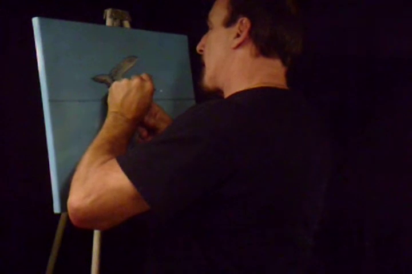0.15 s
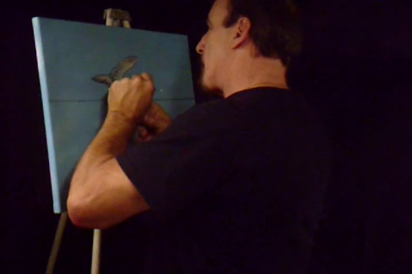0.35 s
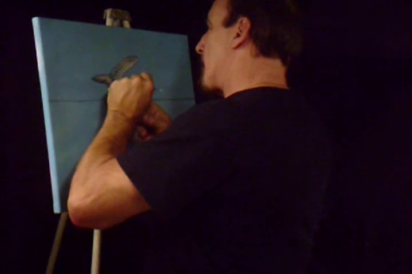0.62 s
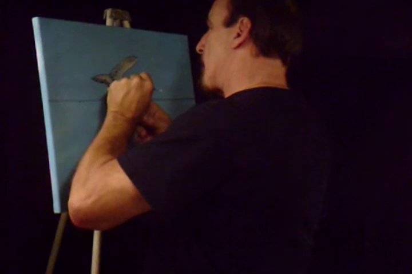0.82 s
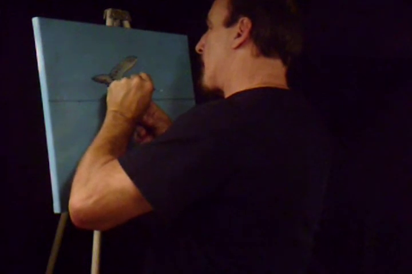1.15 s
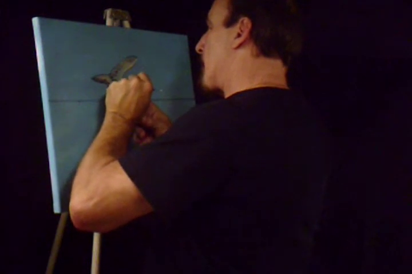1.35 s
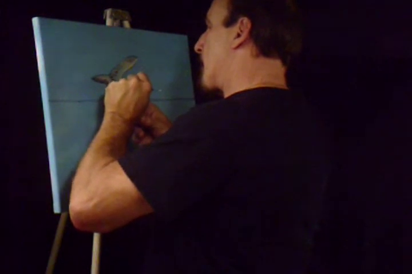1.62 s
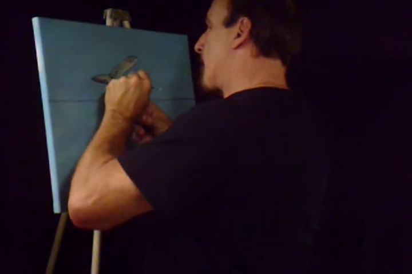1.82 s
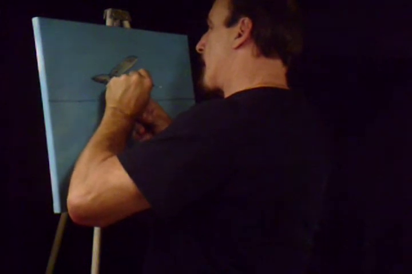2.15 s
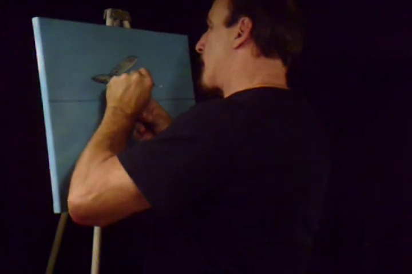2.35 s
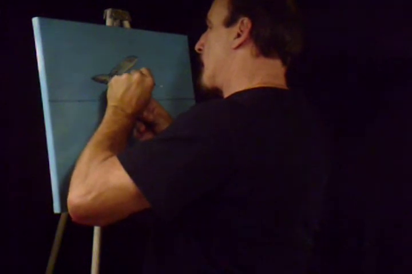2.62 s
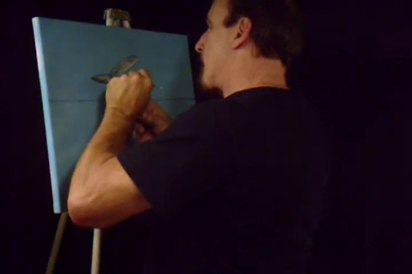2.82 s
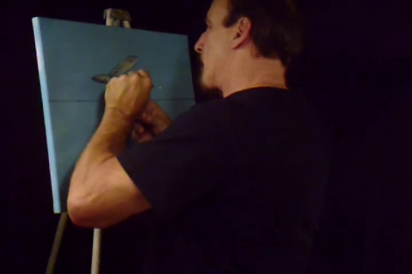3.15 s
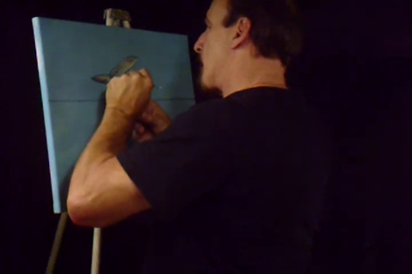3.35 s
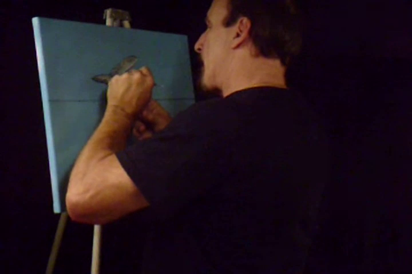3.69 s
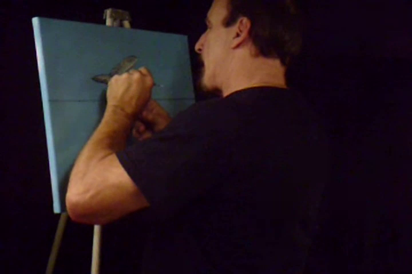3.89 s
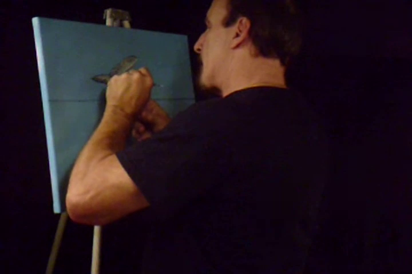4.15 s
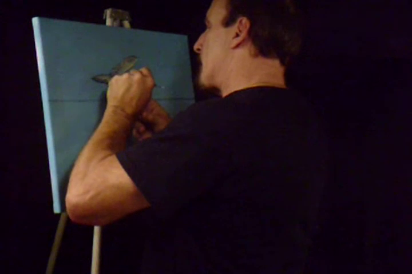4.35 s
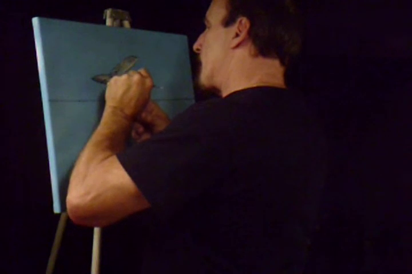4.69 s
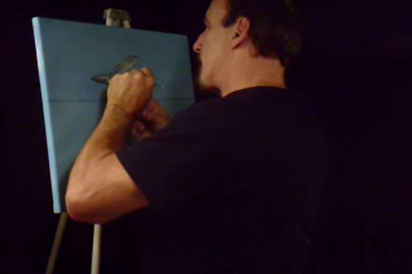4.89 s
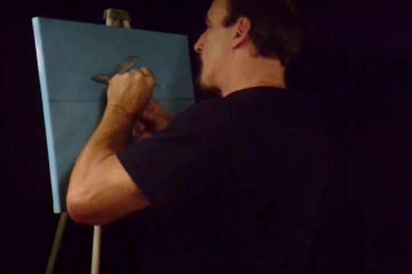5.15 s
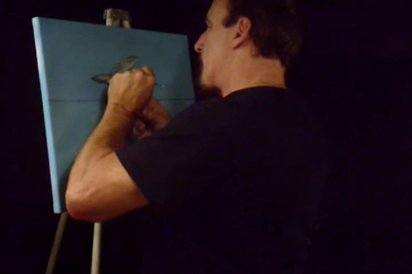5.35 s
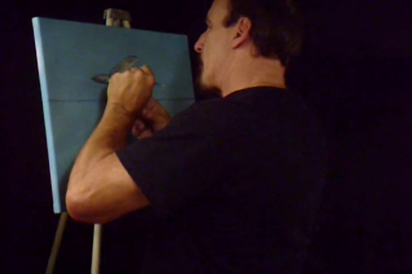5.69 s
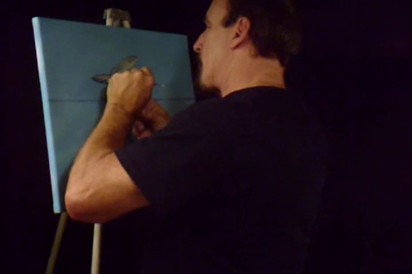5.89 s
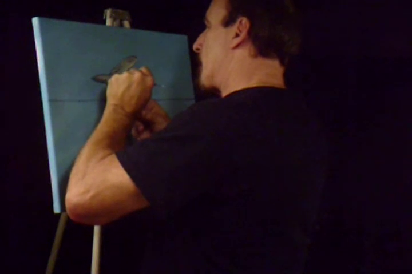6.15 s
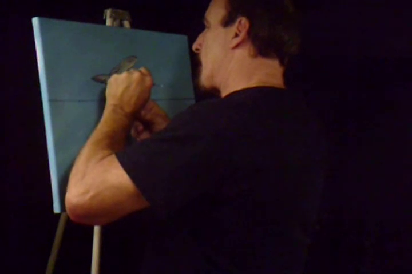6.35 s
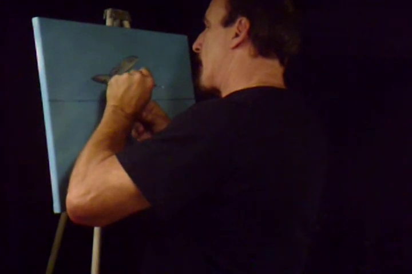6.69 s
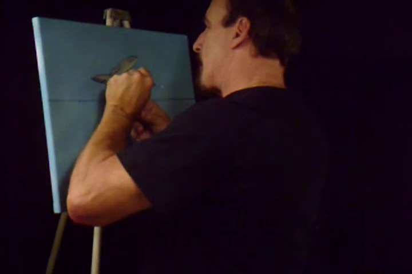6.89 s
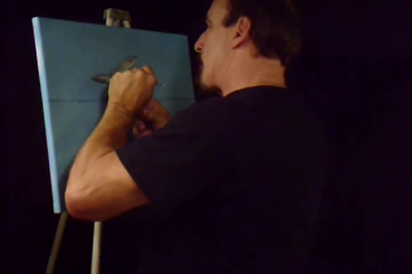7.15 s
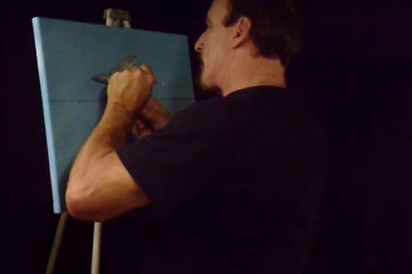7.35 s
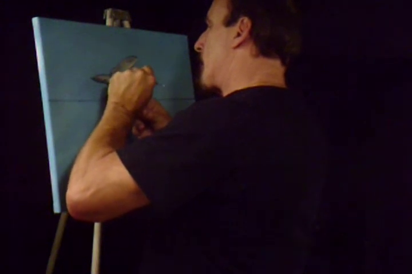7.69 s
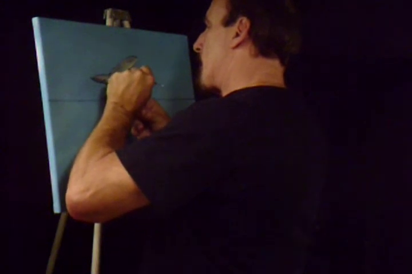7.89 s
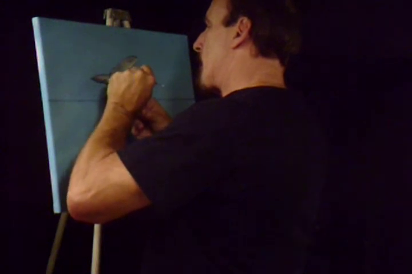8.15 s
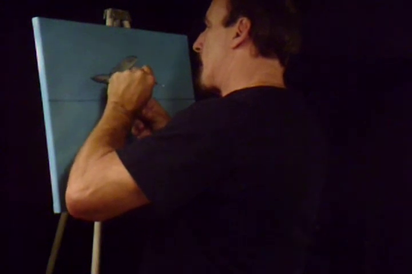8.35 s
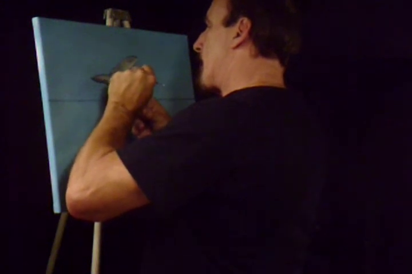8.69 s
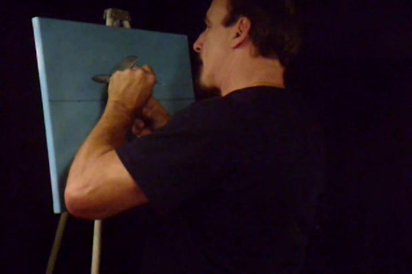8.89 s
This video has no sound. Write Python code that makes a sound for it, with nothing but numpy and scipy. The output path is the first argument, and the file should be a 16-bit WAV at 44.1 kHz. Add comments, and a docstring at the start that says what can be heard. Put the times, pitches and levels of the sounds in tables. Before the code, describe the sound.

A paintbrush knocks against a stretched canvas on an easel, making dull low thumps in quick uneven runs of three and four, each with a tiny squeak. They continue throughout, over a low motor hum and soft rush of room air. A faint high electronic whine pulses rapidly with fizz and little chirps, and now and then the microphone's level dips with a click.

```python
"""Dull thumps in threes and fours on a tenth-second beat, each with a tiny squeak, over room hum and rush.
Thumps, pulsing whine, fizz and faint chirps: most likely a camera's electronics drawing current in bursts.
The hum is a motor in the room plus thin steady tones.
After some thumps the level snaps down with a click and creeps back; a faint hiss stays constant."""
import sys
import numpy as np
from scipy import signal
from scipy.fft import rfft, irfft, next_fast_len
from scipy.io import wavfile

SR = 44100
rng = np.random.default_rng(int(sys.argv[2]) if len(sys.argv) > 2 else 0)


def master_out(mix):
    """Clip the mix to full scale and print it as 16-bit PCM to the path in sys.argv[1]."""
    frames = np.transpose(np.atleast_2d(mix))
    ceiling = np.clip(frames, -1, 1)
    pcm = np.round(ceiling * 32767).astype(np.int16)
    wavfile.write(sys.argv[1], SR, pcm)


N = 397341
TIME_S = np.arange(N) / SR
BURST_HZ, THUMP_DUE_EVERY_S = 19.87, 0.2312
BURST_INDEX, BURST_AGE_S = (TIME_S * BURST_HZ).astype(int), TIME_S % (1 / BURST_HZ)

# room rumble and rush: freq_hz, density_db_per_hz
RUSH_SPECTRUM = [(10, -47.5), (32, -53.5), (100, -65.5), (205, -73), (260, -72.5), (380, -77.5),
                 (580, -80.5), (850, -78.5), (1250, -88), (1850, -89.5), (2300, -92.5), (4000, -95),
                 (9900, -96.5)]
# swell of the rush: time_s, gain_db
RUSH_SWELL = [(0, -0.5), (.9, -1), (2.2, -0.94), (3.3, -1.1), (4.3, -0.5), (4.85, 0), (5.15, -1.3),
              (6.1, -0.5), (6.5, 0), (7.25, -1.9), (7.45, -1.5), (8.2, -0.75), (9, 1.5)]
# motor hum and thin tones: pitch_hz, level_db, width_hz
HUM_LINES = [(44.1, -40, 6), (87.5, -48, 3.3), (132.9, -66.5, 2.1), (299.2, -59, 2.1), (367.3, -68, 3.5),
             (675, -65.5, 6.6), (822, -71, 8.4), (865, -66.5, 2.5), (1474, -69, 1), (1655, -79.5, 0.69),
             (1835, -72, 1.2), (2946, -79, 0.93), (7460, -92, 1)]
# whine tones: pitch_hz, level_db
WHINE_TONES = [(4200, -73.5), (9600, -67.5), (10800, -101)]
# hiss pulsing with the whine: freq_hz, density_db_per_hz
WHINE_HISS = [(1000, -108), (2800, -99), (6000, -99.5), (9800, -99.5)]
# squeak bands: pitch_hz, width_hz, level_db, delay_s, length_s
SQUEAK_BANDS = [(502.8, 400, -46, 0.00059, 0.0119), (2580, 1300, -57, 0.00085, 0.01),
                (6160, 220, -51.5, 0.0039, 0.0076), (6900, 590, -60.5, 0.0075, 0.0062),
                (8670, 600, -59, .002, 0.0097), (9860, 260, -56.5, 0.00095, 0.0061)]
# loudest chirps: burst_time_s, mid_pitch_hz, level_db
LOUD_CHIRPS = [(2.54, 8300, -53), (3.24, 8500, -54), (5.61, 7550, -52), (6.26, 4420, -50),
               (7.375, 9400, -50), (7.565, 8230, -48.5), (7.77, 9650, -49.5)]
# level drops: start_s, target_gain_db, click_db
LEVEL_DROPS = [(0.4035, -1, -22), (1.3087, -1.5, -25), (2.0171, -3, -23.5), (2.5158, -2, -27.5),
               (3.2246, -2.5, -21), (3.933, -0.25, -30), (4.339, -.5, -26), (5.036, 0.5, -21),
               (5.5464, -1.5, -18.5), (6.2435, -2.5, -17.7), (7.3458, -5, -20.5), (8.4608, -3.5, -24)]
# constant hiss: freq_hz, density_db_per_hz
STEADY_HISS = [(1000, -104), (5000, -101), (10000, -100.5)]
# treble roll-off: freq_hz, gain_db
TREBLE_ROLLOFF = [(10000, 0), (11000, -8.5), (12100, -24)]


def gain_of(db):
    """Decibels to amplitude."""
    return 10 ** (np.asarray(db) / 20)


def unit_rms(x):
    """Scale to rms 1."""
    return x / np.sqrt(np.mean(abs(x) ** 2) + 1e-20)


def add(mix, start_s, sound):
    """Mix in at start_s."""
    part = mix[max(round(start_s * SR), 0):][:len(sound)]
    part += sound[:len(part)]


def lowpass(x, corner_hz):
    """One-pole low-pass."""
    pole = np.exp(-2 * np.pi * corner_hz / SR)
    return signal.lfilter([1 - pole], [1, -pole], x)


def window(age_s, length_s, edge_s):
    """Gate from 0 to length_s, linear edges."""
    return np.clip(np.minimum(age_s, length_s - age_s) / edge_s + .5, 0, 1)


def tone(pitch_hz):
    """Sine, rms 1, random phase."""
    return np.sqrt(2) * np.sin(2 * np.pi * (pitch_hz * TIME_S + rng.random()))


def noise(spectrum):
    """Steady noise of a given spectral density."""
    hz, db = np.transpose(spectrum)
    size = next_fast_len(N)
    density_db = np.interp(np.log(np.fft.rfftfreq(size, 1 / SR) + 1), np.log(hz + 1), db)
    return irfft(rfft(rng.standard_normal(size)) * gain_of(density_db), size)[:N] * np.sqrt(SR / 2)


def noise_band(pitch_hz, width_hz, steadiness=0.):
    """Noise around pitch_hz, rms 1; steadiness 1 flattens its envelope."""
    white = rng.standard_normal(N) + 1j * rng.standard_normal(N)
    wobble = lowpass(lowpass(white, width_hz), width_hz)
    wobble /= (abs(wobble) + 1e-12) ** steadiness
    carrier = np.exp(2j * np.pi * np.cumsum(pitch_hz * np.ones(N)) / SR)
    return unit_rms((wobble * carrier).real)


def room(waver=0.28):
    """Broad, gently swelling rush; wavering motor hum and thin tones."""
    out = noise(RUSH_SPECTRUM) * gain_of(np.interp(TIME_S, *np.transpose(RUSH_SWELL)))
    for pitch_hz, level_db, width_hz in HUM_LINES:
        line = tone(pitch_hz) + waver * np.sqrt(width_hz) * noise_band(pitch_hz, width_hz)
        out += gain_of(level_db) * unit_rms(line)
    return out


def whine(delay_s=0.009, on_s=0.0287, idle_gain=0.068):
    """Thin tones and hiss, gated once per current burst."""
    gate = window(BURST_AGE_S - delay_s, on_s, edge_s=0.0016)
    tones = sum(gain_of(level_db) * tone(pitch_hz) for pitch_hz, level_db in WHINE_TONES)
    return (idle_gain + (1 - idle_gain) * gate) * (tones + noise(WHINE_HISS))


def fizz(level_db=-64.5, spread_db=6, low_hz=7860, high_hz=12200):
    """One faint high spit per burst; random pitch, onset and level."""
    pitch, onset, strength = rng.random((BURST_INDEX[-1] + 1, 3))[BURST_INDEX].T
    gain = gain_of(level_db + spread_db * (2 * strength - 1))
    gate = window(BURST_AGE_S - .008 - 0.026 * onset, length_s=0.0057, edge_s=0.0033)
    return gain * gate * noise_band(low_hz + (high_hz - low_hz) * pitch, width_hz=1400)


def thump_times_s(first_due_s=0.0953, first_beat_s=0.1668, late_s=0.0063):
    """Thumps fall due evenly but wait for a beat, so bunch in threes and fours. Every 4th beat lags."""
    beat_s = 2 / BURST_HZ
    due_s = np.arange(first_due_s, TIME_S[-1], THUMP_DUE_EVERY_S)
    beat = np.ceil((due_s - first_beat_s) / beat_s)
    return first_beat_s + beat * beat_s + late_s * (beat % 4 == 1)


def thumps(push_s=0.00952, wait_db_per_s=6, corner_hz=342, slow_hz=10.66, leak_hz=13.4, gain_db=0.3):
    """Flat push, rounded and leaking away: a dip, then a soft rebound. Stronger after a longer wait."""
    pushes, starts_s = np.zeros(N), thump_times_s()
    for start_s, wait_s in zip(starts_s, np.diff(starts_s, prepend=0)):
        strength = gain_of(wait_db_per_s * (wait_s - THUMP_DUE_EVERY_S))
        add(pushes, start_s, -strength * np.ones(round(push_s * SR)))
    rounded = lowpass(lowpass(pushes, corner_hz), slow_hz)
    return gain_of(gain_db) * (rounded - lowpass(rounded, leak_hz))


def squeaks(gain_db=-1.14, scatter_db=1.05):
    """Low rasp and a few high tones during each thump's push."""
    out, starts_s = np.zeros(N), thump_times_s()
    age_s = np.arange(SR // 40) / SR
    for pitch_hz, width_hz, level_db, delay_s, length_s in SQUEAK_BANDS:
        gate = window(age_s - delay_s, length_s, edge_s=0.00028)
        envelope = np.zeros(N)
        for start_s in starts_s:
            add(envelope, start_s, gain_of(rng.normal(gain_db, scatter_db)) * gate)
        out += gain_of(level_db) * envelope * noise_band(pitch_hz, width_hz, steadiness=0.65)
    return out


def chirps(level_db=-58, scatter_db=2.5, low_hz=3600, high_hz=9000, stray_chance=.07,
           middle_s=.022, length_s=0.014, fall_hz_per_s=100000):
    """Falling noise band on the burst after each thump, occasionally on others."""
    bursts = np.arange(BURST_INDEX[-1] + 1)
    pitch, chance = rng.random((len(bursts), 2)).T
    after_thump = np.isin(bursts - 1, (thump_times_s() * BURST_HZ).astype(int))
    active = after_thump | (chance < stray_chance)
    mid_hz = low_hz + (high_hz - low_hz) * pitch
    gain = active * gain_of(rng.normal(level_db, scatter_db, len(bursts)))
    for time_s, loud_hz, loud_db in LOUD_CHIRPS:
        burst = int(time_s * BURST_HZ)
        mid_hz[burst], gain[burst] = loud_hz, gain_of(loud_db)
    from_middle_s = BURST_AGE_S - middle_s
    gate = window(from_middle_s + length_s / 2, length_s, edge_s=.008)
    sweep_hz = mid_hz[BURST_INDEX] - fall_hz_per_s * from_middle_s
    return gain[BURST_INDEX] * gate * noise_band(sweep_hz, width_hz=990)


def level_drops(initial_db=1.9, recovery_db_per_s=7.5, smoothing_hz=49.5):
    """Gain curve: fast fall at each drop, steady climb between."""
    start_s, target_db, _ = np.transpose(LEVEL_DROPS)
    latest = np.searchsorted(start_s, TIME_S, "right")
    age_s = TIME_S - np.r_[0, start_s][latest]
    gain_db = np.r_[initial_db, target_db][latest] + recovery_db_per_s * age_s
    return gain_of(lowpass(gain_db, smoothing_hz))


def clicks(leak_hz=40.5, corner_hz=7000):
    """Negative step at each level drop, leaking away."""
    steps = np.zeros(N)
    decay = np.exp(-2 * np.pi * leak_hz * TIME_S[:SR // 10])
    for start_s, _, click_db in LEVEL_DROPS:
        add(steps, start_s, -gain_of(click_db) * decay)
    return lowpass(steps, corner_hz)


def scene():
    """Room, thumps and small electrical noises; mono."""
    return (room() + thumps() + squeaks() + whine() + fizz() + chirps())[None]


def record(dry, cutoff_hz=12300):
    """Level drops, clicks and steady hiss, then treble roll-off."""
    mix = dry * level_drops() + clicks() + noise(STEADY_HISS)
    freq_hz = np.linspace(0, SR / 2, num=513)
    response = gain_of(np.interp(freq_hz, *np.transpose(TREBLE_ROLLOFF))) * (freq_hz < cutoff_hz)
    taps = signal.firwin2(255, freq_hz, response, window=("kaiser", 8), fs=SR)
    return signal.oaconvolve(mix, taps[None], "same")


dry = scene()
out = record(dry)
master_out(out)
```